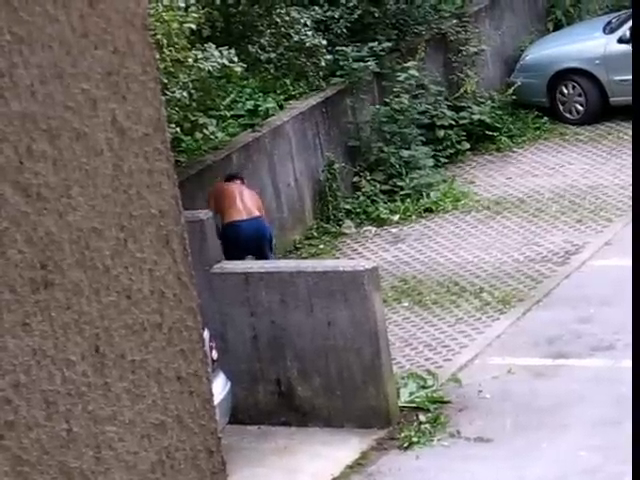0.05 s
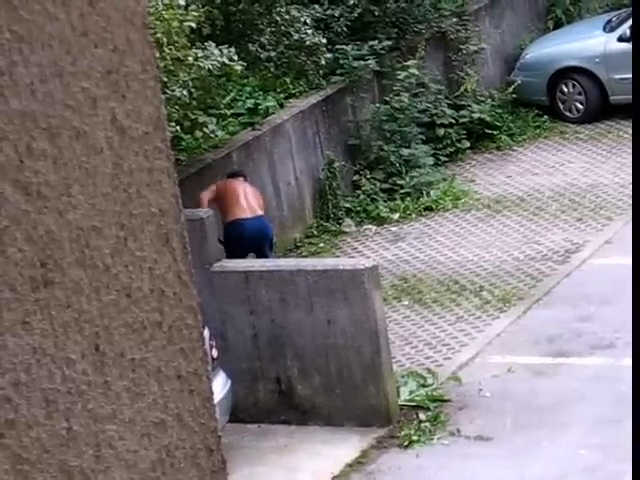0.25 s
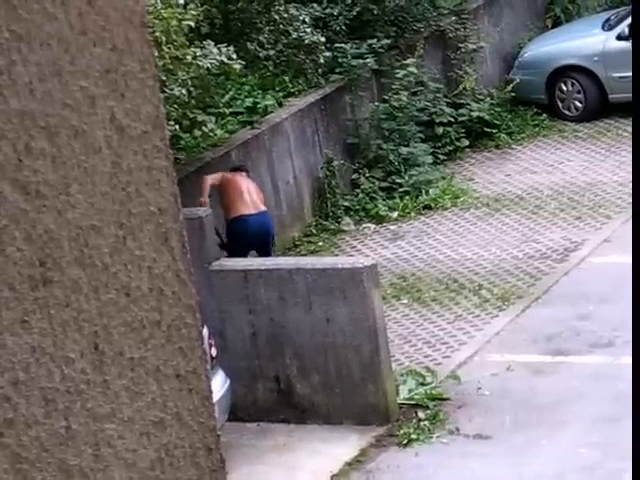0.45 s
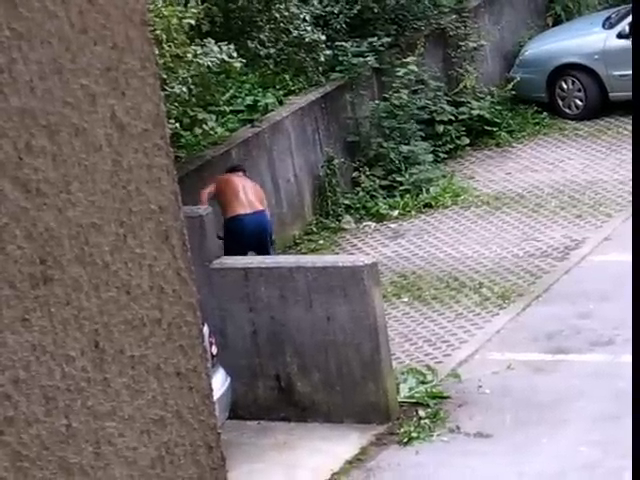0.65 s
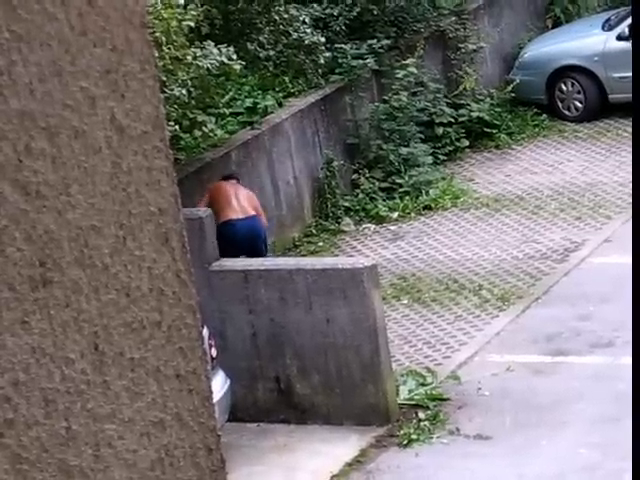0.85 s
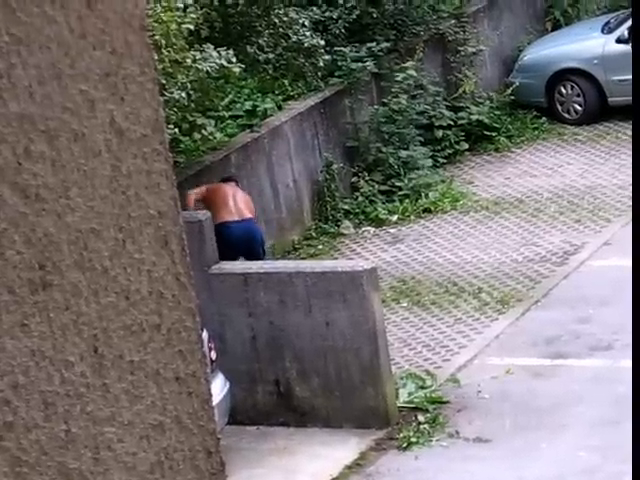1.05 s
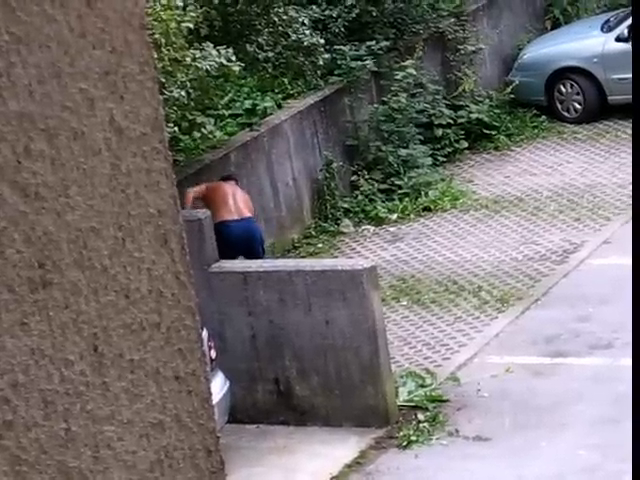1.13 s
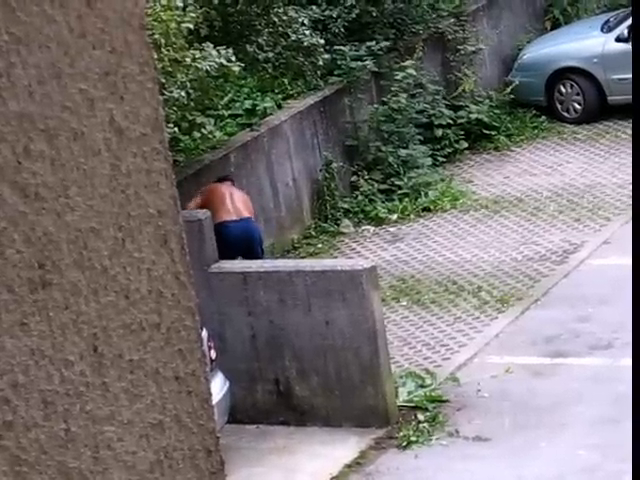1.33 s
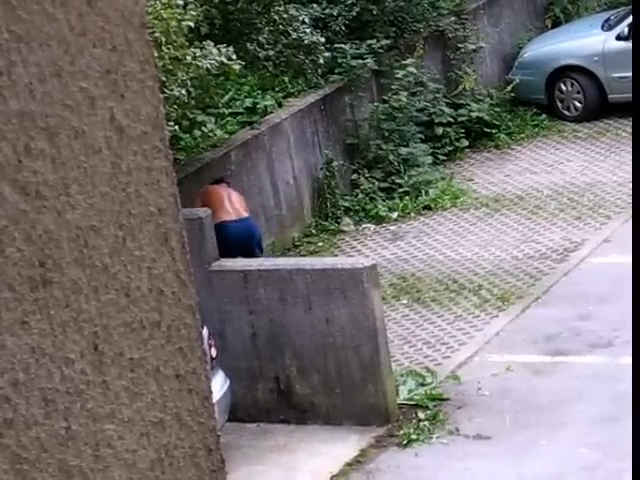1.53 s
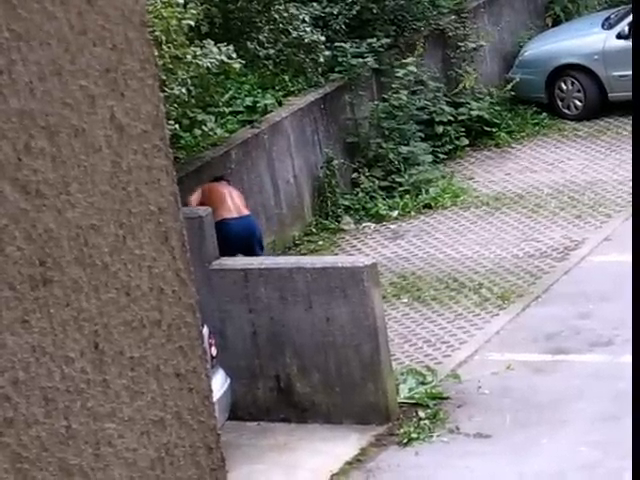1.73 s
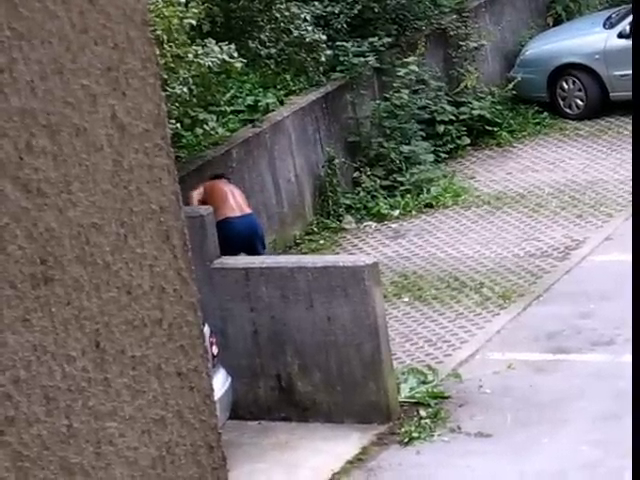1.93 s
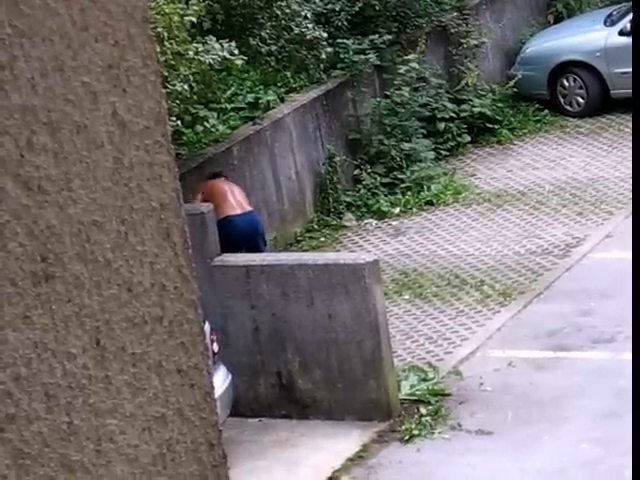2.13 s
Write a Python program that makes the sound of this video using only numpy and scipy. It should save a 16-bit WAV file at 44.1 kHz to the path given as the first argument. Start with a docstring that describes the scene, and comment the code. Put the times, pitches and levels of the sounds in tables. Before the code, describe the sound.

A steel hand tool works on concrete in a walled yard. At about 0.2 seconds a heavy thud sets off a deep boom and runs into a gritty, ringing scrape lasting until about 0.6 seconds. Two sharp blows follow near 1.1 and 1.8 seconds, each a quick clatter with short clinks, the second adding a low knock. The walls echo after each, over a quiet, steady town rumble.

```python
"""A man works on concrete with a steel hand tool in a walled parking yard, over a quiet town rumble.
A heavy thud sets off a deep boom and runs into a gritty scrape that rings the steel and clinks the blade.
Two sharp blows follow near 1.1 s and 1.8 s, each a quick clatter of contacts with short clinks;
the second also draws a low knock from the concrete block. The walls ring on after thud and blows."""
import sys
import numpy as np
from scipy import signal
from scipy.fft import rfft, irfft
from scipy.io import wavfile

SR = 44100
rng = np.random.default_rng(int(sys.argv[2]) if len(sys.argv) > 2 else 0)


def unload_wav(signal):
    """Save mono or channel-first audio to the path in sys.argv[1] as 16-bit WAV at rate SR, clipped to [-1, 1]."""
    wavfile.write(
        sys.argv[1],
        SR,
        np.round(np.clip(np.atleast_2d(signal).T, -1, 1) * 32767).astype(np.int16),
    )


N = 97020

# thud with scrape, first blow, second blow: start_s
EVENT_STARTS_S = [.21, 1.087, 1.82]
# heavy impact and its shudders: start_s, rise_s, decay_s, level_db
THUD_PULSES = [(0.214, 0.013, 0.024, -19.5), (0.239, 0.0073, 0.028, -24.5), (.34, .02, 0.13, -32),
               (0.441, 0.018, 0.026, -28.5)]


def undb(db):
    """Decibels to gain."""
    return 10 ** (np.asarray(db) / 20)


def on_log(query_hz, hz, values):
    """Linear interpolation over log frequency."""
    return np.interp(np.log(query_hz + 1), np.log(hz), values)


def colour(x, spectrum, size=8192):
    """Minimum-phase filter of the given spectral shape; keeps the power of white noise."""
    bins_hz = np.arange(size // 2 + 1) * SR / size
    cepstrum = irfft(np.log(undb(on_log(bins_hz, *np.array(spectrum).T))))
    cepstrum[1:size // 2] *= 2
    cepstrum[size // 2 + 1:] = 0
    response = irfft(np.exp(rfft(cepstrum)))
    return signal.fftconvolve(x, response / np.linalg.norm(response))[:N]


def ring(x, hz, width_hz):
    """One resonance, scaled to the energy of its drive."""
    pole = np.exp((2j * np.pi * hz - np.pi * abs(width_hz)) / SR)
    y = signal.lfilter([1, -1], np.poly([pole, np.conj(pole)]).real, x + 1e-18)
    return y * np.linalg.norm(x) / np.linalg.norm(y)


def burst(age_s, rise_s, decay_s):
    """Linear rise, exponential fall."""
    return np.clip(age_s / rise_s, 0, 1) * np.exp(-np.maximum(age_s - rise_s, 0) / decay_s)


def drift(rate_hz):
    """Smooth random drift, spread near 1."""
    return np.interp(np.arange(N) * rate_hz / SR, np.arange(N), rng.standard_normal(N))


def town_rumble():
    """Steady distant rumble and faint hiss."""
    # freq_hz, density_db
    spectrum = [(15, -15), (25, 0.5), (98, -10.5), (213, -23.5), (354, -18), (427, -23), (621, -22.5),
                (833, -29), (978, -31), (1540, -32.5), (1810, -29.5), (1960, -32), (2780, -33.5),
                (3630, -36), (15000, -49.5)]
    return undb(-36.5) * colour(rng.standard_normal(N), spectrum)


def grains(spread_db=3):
    """Crunch of grit: unit-power noise whose level jumps from grain to grain."""
    crunch = rng.standard_normal(N) * undb(spread_db * drift(rate_hz=1500))
    return crunch / np.std(crunch)


def tool(t):
    """Scraping strokes and sharp contacts crush grit, knock the concrete and ring the steel."""
    # scrape strokes: start_s, rise_s, decay_s, level_db
    strokes = [(.17, 0.031, 0.022, -40), (.222, 0.023, 0.06, -27.5), (0.313, 0.027, .018, -23.5),
               (.358, 0.005, 0.032, -28), (0.424, 0.009, 0.011, -25), (0.456, 0.0036, 0.047, -29)]
    # steel on concrete: start_s, grit_db, knock_db, decay_s
    contacts = [(1.0866, -19, -39, 0.017), (1.093, -15.5, -26, 0.019), (1.12, -21.5, -25, 0.014),
                (1.144, -19.5, -25, 0.019), (1.174, -21.5, -29, 0.016), (1.236, -37, -39, 0.02),
                (1.604, -48, -35.5, 0.0051), (1.698, -41.5, -32.5, 0.007), (1.82, -15.5, -29, 0.014),
                (1.831, -20.5, -38, 0.018), (1.850, -16, -23, 0.028), (1.877, -24, -31, 0.013),
                (1.908, -19, -24, 0.0064)]
    # dragged blade, crushed grit, knocked concrete: freq_hz, density_db
    scrape_spectrum = [(200, -10), (900, -2), (1500, 1.5), (2400, 3.5), (3200, 2.5), (4500, 0.5),
                       (7000, -3.5), (9000, -5.5), (11000, -18.5), (13500, -7.5), (16000, -9)]
    grit_spectrum = [(200, -16), (1000, -5.5), (1700, -2), (2400, 0.5), (3200, 2.5), (4500, 4), (6500, 1),
                     (8800, -8.5), (10000, -13.5), (11100, -32), (12200, -13), (13500, -7), (16000, -6)]
    knock_spectrum = [(60, -14), (130, -5), (190, 0), (290, -1.5), (400, 5.5), (510, -12.5), (660, 7),
                      (850, -11.5), (1050, -2), (1250, -22), (1500, -16), (3000, -26), (12000, -55)]
    drag = sum(undb(db) * burst(t - start_s, rise_s, decay_s) for start_s, rise_s, decay_s, db in strokes)
    crush = impact = 0
    for start_s, grit_db, knock_db, decay_s in contacts:
        pulse = burst(t - start_s, 0.0015, decay_s)
        crush += undb(grit_db) * pulse
        impact += undb(knock_db) * pulse
    grit = undb(-4) * colour(grains() * crush, grit_spectrum)
    knock = colour(grains() * impact, knock_spectrum)
    scrape = undb(-1.5) * colour(grains() * drag, scrape_spectrum)
    return scrape + grit + knock + steel(grains() * (crush + drag), t)


def early_echoes(x, t):
    """Direct sound plus its doubles off the closest walls."""
    # reflections: delay_s, gain_db
    echoes = [(.0047, -15.5), (.0083, -17.5), (0.0132, -14.5)]
    return x + sum(undb(db) * np.roll(x, int(delay_s * SR)) * (t > delay_s) for delay_s, db in echoes)


def yard_reverb(x, t, build_s=0.018):
    """Scattered wall echoes build quickly and fade band by band."""
    # reverberation: freq_hz, t60_s, gain_db
    bands = [(100, 2.1, -7.5), (297, 2.1, -15.5), (720, 1.6, -3), (1300, 0.8, -4), (2800, 1.18, -5),
             (5600, 0.92, -6.5), (12000, 0.99, -3.5)]
    band_hz, t60s_s, gains_db = np.array(bands).T
    noise_spectrum = rfft(rng.standard_normal(N))
    bins_hz = np.arange(N // 2 + 1) * SR / N
    response = 0
    for share, t60_s, gain in zip(np.eye(len(band_hz)), t60s_s, undb(gains_db)):
        band_noise = irfft(noise_spectrum * on_log(bins_hz, band_hz, share), N)
        envelope = burst(t, build_s, t60_s / np.log(1000))
        response += gain * band_noise * envelope / np.linalg.norm(envelope)
    return signal.fftconvolve(x, response)[:N]


def boom(t, pitch_hz=36.08):
    """Something large, like a panel, swings with the thud and shakes its higher modes."""
    # swing envelope: time_s, level_db
    contour = [(.17, -60), (.205, -21), (.235, -11.5), (.28, -10.5), (.385, -12.5), (.42, -15.5),
               (.46, -36), (.52, -15.5), (.575, -19.5), (.625, -18.5), (.67, -29), (.71, -24), (.77, -31.5),
               (.88, -27.5), (1.1, -53)]
    # panel resonances: freq_hz, width_hz, level_db
    modes = [(79, 24, -6.5), (103, 16, -4.5), (163.7, 14.5, -4), (180.5, 4, -8), (240, 36, -6),
             (365, 29, -5)]
    swing = undb(np.interp(t, *np.array(contour).T, left=-120, right=-120))
    shake = swing * rng.standard_normal(N)
    panel = sum(undb(db) * ring(shake, hz, width_hz) for hz, width_hz, db in modes)
    thud_start_s = THUD_PULSES[0][0]
    phase_rad = 2 * np.pi * pitch_hz * (t - thud_start_s) + np.pi * 3 / 4
    return np.sqrt(2) * swing * np.sin(phase_rad) + undb(-18.5) * panel


def steel(force, t):
    """The scrape and each blow ring the same tool modes with their own strengths."""
    # drive reaching the steel: freq_hz, density_db
    drive_spectrum = [(100, 0), (800, 0.5), (8800, -0.5), (10500, -18)]
    # tool resonances: freq_hz, width_hz, scrape_db, first_blow_db, second_blow_db
    modes = [(1067, 105, -14, -35, -21), (1367, 26, -13, -15, -24), (1464, 69, -16, -15.5, -26),
             (1560, 13, -16, -20, -21.5), (1960, 48, -22, -15.5, -36), (2176, 105, -12, -16, -14),
             (2368, 65, -18, -15.5, -21), (2457, 210, -16, -26, -13.5), (2793, 23, -15.5, -18.5, -26),
             (3444, 51, -11.5, -23, -14.5), (3970, 140, -13.5, -10.5, -18), (4475, 200, -33, -35, -16),
             (6570, 70, -20, -15, -20.5), (6910, 100, -21, -18, -26), (8430, 57, -29, -20.5, -19.5)]
    drive = colour(force, drive_spectrum)
    event = np.searchsorted(EVENT_STARTS_S, t, side="right") - 1
    return sum(undb(db) * ring(drive * (event == k), hz, width_hz)
               for hz, width_hz, *levels_db in modes for k, db in enumerate(levels_db))


def wall_modes(t, rise_s=0.03, beat_hz=29.91):
    """Clusters of close resonances between the walls beat and fade after each event."""
    # freq_hz, decay_s, thud_db, first_blow_db, second_blow_db
    clusters = [(369.5, 0.15, -27, -52, -43), (406, 0.031, -31, -32, -30), (611, 0.22, -37.5, -33.5, -37.5),
                (733, 0.13, -32.5, -42, -29.5), (843, 0.14, -40, -43, -64), (992, 0.088, -38, -52, -36)]
    out = 0
    for hz, decay_s, *levels_db in clusters:
        beating = drift(beat_hz) + 1j * drift(beat_hz)
        envelope = sum(undb(db) * burst(t - start_s, rise_s, decay_s)
                       for start_s, db in zip(EVENT_STARTS_S, levels_db))
        out += envelope * (beating * np.exp(2j * np.pi * hz * t)).real
    return out


def thud(t):
    """A dull, heavy impact shudders as it settles."""
    # freq_hz, density_db
    spectrum = [(40, -6), (90, -3), (160, 1.5), (280, -7.5), (370, -0.5), (500, -7.5), (740, -2),
                (940, -10.5), (1070, -9.5), (1400, -23.5), (3000, -19), (12000, -33)]
    envelope = sum(undb(db) * burst(t - start_s, rise_s, decay_s)
                   for start_s, rise_s, decay_s, db in THUD_PULSES)
    return colour(grains() * envelope, spectrum)


def clinks(t, pitch_jitter=0.02553, overtone_db=-13.5):
    """The skidding blade edge sings briefly, with one high overtone."""
    # edge on stone: start_s, pitch_hz, overtone_hz, level_db
    skids = [(.246, 2430, 6600, -24), (.336, 4450, 5500, -22.5), (.368, 2248, 3440, -21.5),
             (.44, 1540, 3500, -24), (.459, 2250, 4100, -25), (1.094, 2340, 4430, -17.5),
             (1.1172, 2340, 8800, -11), (1.130, 2800, 8500, -14.5), (1.175, 2800, 8400, -21),
             (1.828, 2460, 3520, -23.5), (1.882, 2250, 8800, -17), (1.9062, 2274, 8830, -14.5)]
    warped_s = t + np.cumsum(pitch_jitter * drift(rate_hz=700)) / SR
    out = 0
    for start_s, pitch_hz, overtone_hz, db in skids:
        rad_per_hz = 2 * np.pi * (warped_s - start_s)
        tone = np.sin(pitch_hz * rad_per_hz) + undb(overtone_db) * np.sin(overtone_hz * rad_per_hz)
        out += undb(db) * burst(t - start_s, rise_s=0.0039, decay_s=0.006) * tone
    return out


def block_knocks(t, rise_s=0.0053):
    """The whole concrete block gives short, low knocks under the tool."""
    # start_s, level_db
    knocks = [(1.603, -35), (1.8212, -14.5), (1.853, -31), (1.88, -24)]
    # block resonances: freq_hz, gain_db, decay_s
    modes = [(186, -8, 0.02), (262, -4, 0.013), (352, 0.5, 0.0055)]
    return sum(undb(db + mode_db) * burst(t - start_s, rise_s, decay_s)
               * np.sin(2 * np.pi * hz * (t - start_s))
               for start_s, db in knocks for hz, mode_db, decay_s in modes)


def scene():
    """The work, its echoes and the outdoor background, in mono."""
    t = np.arange(N) / SR
    work = undb(-0.5) * early_echoes(tool(t), t) + thud(t)
    tones = clinks(t) + block_knocks(t)
    echoes = yard_reverb(work + undb(-8.5) * tones, t) + wall_modes(t)
    return (work + tones + echoes + boom(t) + town_rumble())[None]


def record(dry):
    """Steep treble cut and a small DC offset."""
    cutoff_hz, dc_offset = 15700, -0.0253
    lowpass_sos = signal.ellip(10, 0.2, 80, cutoff_hz, fs=SR, output="sos")
    return signal.sosfilt(lowpass_sos, dry) + dc_offset


dry = scene()
out = record(dry)
unload_wav(out)
```